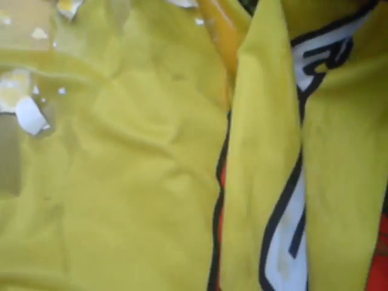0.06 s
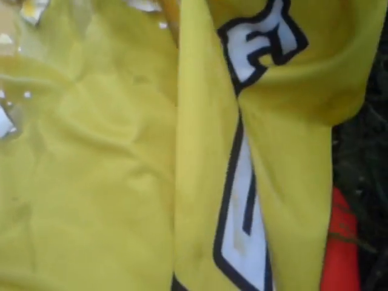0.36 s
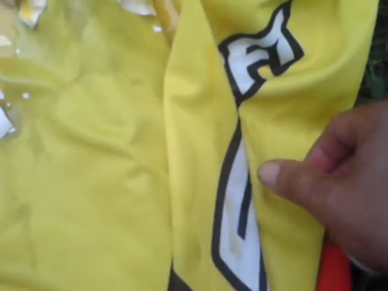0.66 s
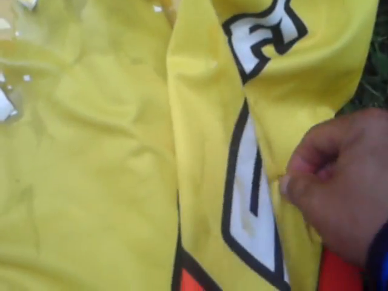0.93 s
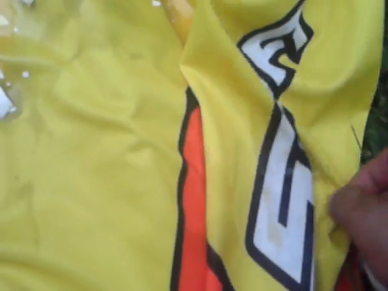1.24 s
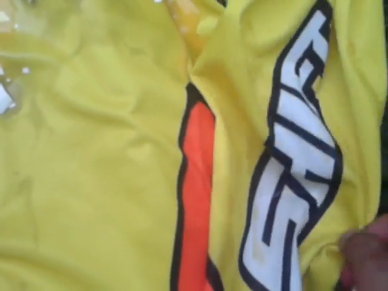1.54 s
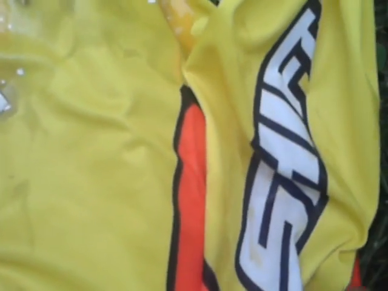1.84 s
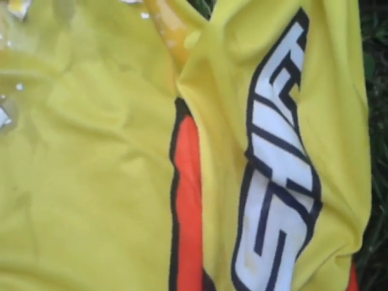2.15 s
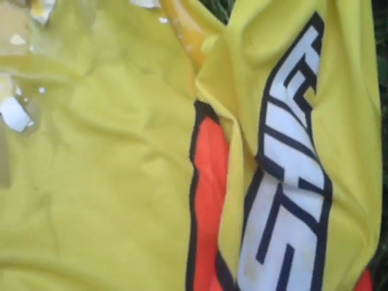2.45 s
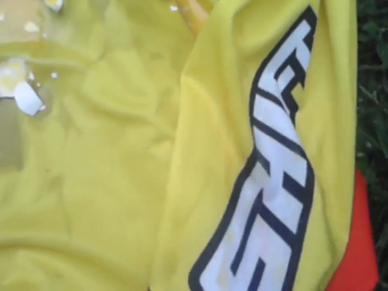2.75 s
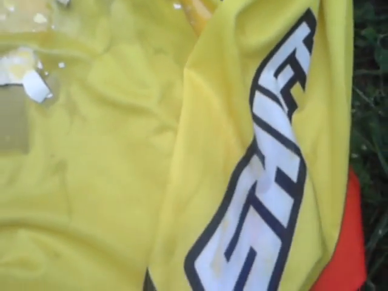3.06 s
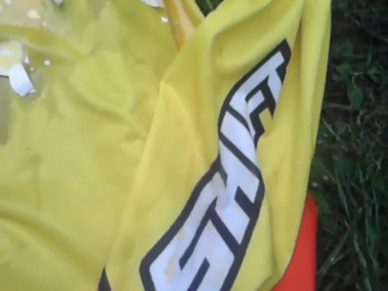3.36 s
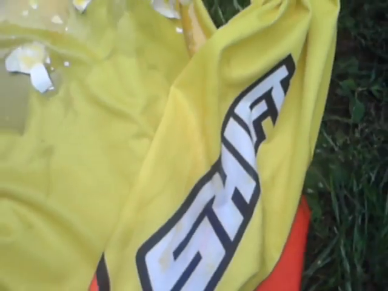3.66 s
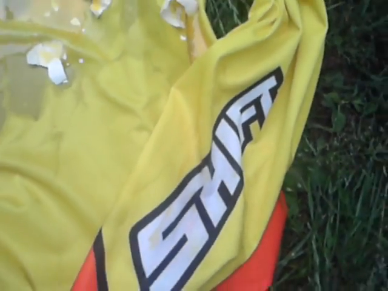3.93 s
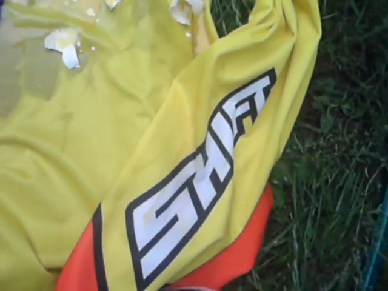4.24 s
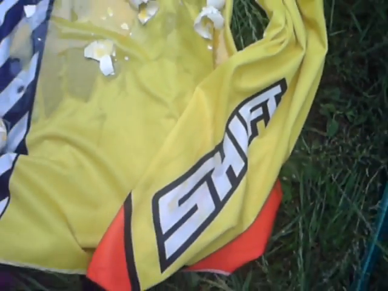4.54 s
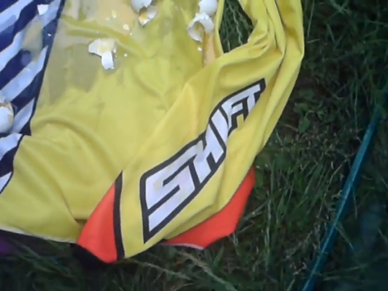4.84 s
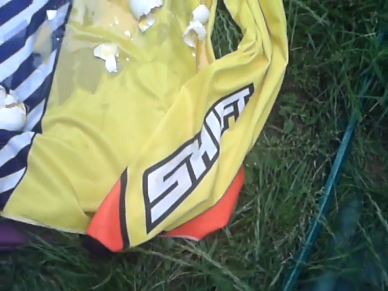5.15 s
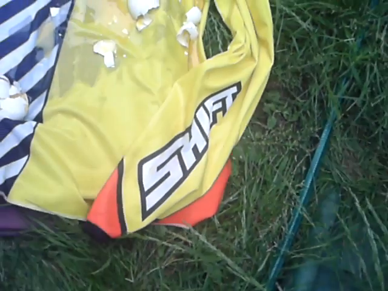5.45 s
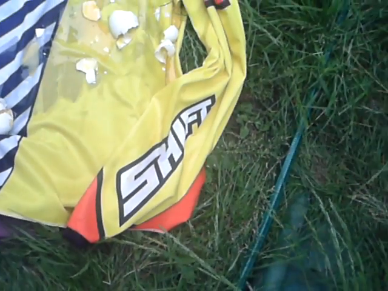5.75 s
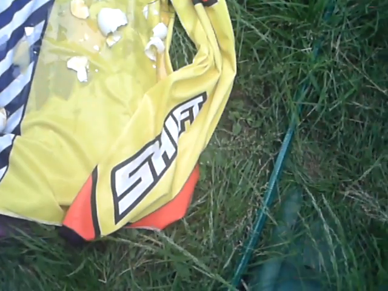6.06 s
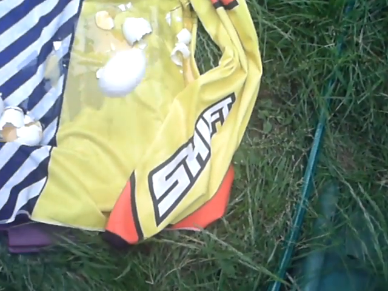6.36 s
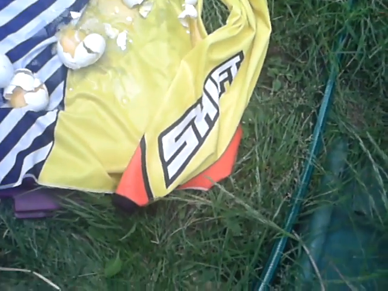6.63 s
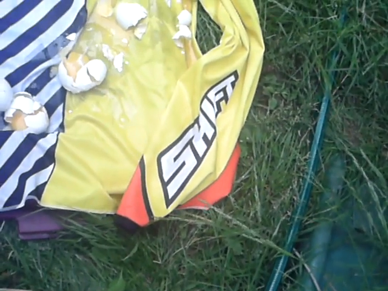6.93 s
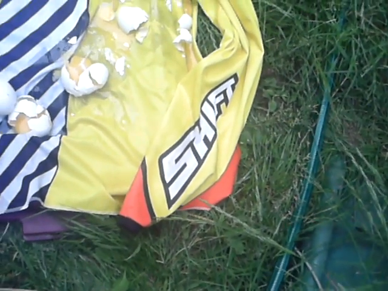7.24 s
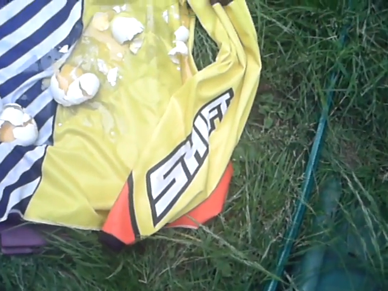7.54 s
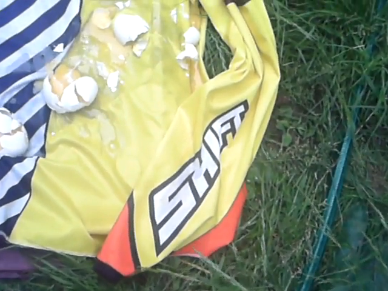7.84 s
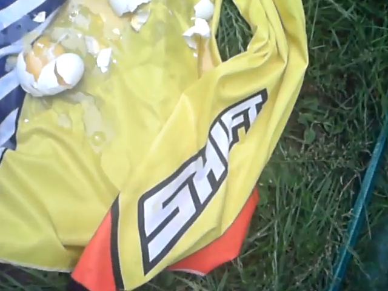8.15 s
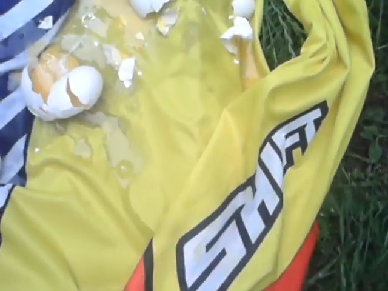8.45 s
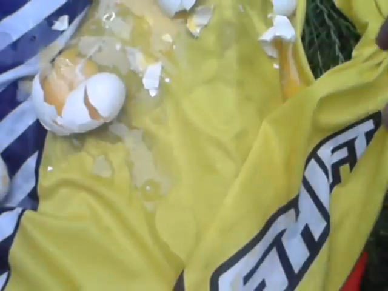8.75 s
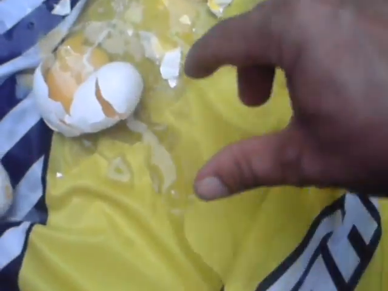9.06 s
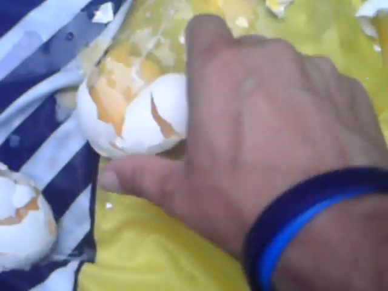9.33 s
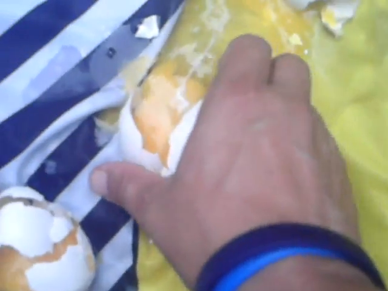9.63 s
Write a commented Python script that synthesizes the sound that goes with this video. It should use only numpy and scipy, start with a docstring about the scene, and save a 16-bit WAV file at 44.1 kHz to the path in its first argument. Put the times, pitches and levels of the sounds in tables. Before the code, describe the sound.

A quiet outdoor rumble and hiss run for the whole ten seconds or so, with faint wavering hums and a thin, high whine, heard through a hand-held microphone. A barely audible low puff of air comes at the very start. Small handling ticks with a brief soft rub occur at about 2.9 seconds and again around 4.7 seconds. At about 6.4 seconds an egg smashes on a shirt spread over grass: one sharp, close smack that combines a dull splat with the crack of shell. It is by far the loudest sound and slightly overloads the microphone. It dies away quickly with a faint outdoor reflection, while a few tiny bits of shell and yolk patter down by 6.5 seconds. The quiet background then continues alone until two soft, low puffs of air from a moving arm touch the microphone at about 9.5 and 9.7 seconds.

```python
"""Egg smashing on a shirt

An egg bursts on a shirt spread over a lawn and overloads a hand-held camera's microphone.
Quick blows ring egg, cloth and turf; the contents splat, the shell splinters, the garden
scatters the smack back and bits patter down. Handling adds ticks, rubs and low puffs of air.
Behind it: quiet rumble, hiss, a faint whine and hums that shift with the camera's height."""
import sys
import numpy as np
from scipy import signal
from scipy.fft import rfft, irfft, next_fast_len
from scipy.io import wavfile

SR = 44100
rng = np.random.default_rng(int(sys.argv[2]) if len(sys.argv) > 2 else 0)


def inscribe(sig):
    """Save sig as 16-bit PCM at rate SR to the path in sys.argv[1].

    A 1-D sig is mono; a 2-D sig holds one channel per row.
    Samples are clipped to [-1, 1] before scaling.
    """
    pcm = np.round(np.clip(np.atleast_2d(sig).T, -1, 1) * 32767)
    wavfile.write(sys.argv[1], SR, pcm.astype(np.int16))


N = 427329
TIME = np.arange(N) / SR
SMACK_S = 6.3786

# Spectrum of splinters and rubs. Each row: frequency in Hz, relative density in dB.
SCRATCH_SPECTRUM = [(200, 0), (700, -8), (1400, 0), (2300, -3), (2800, -10), (3250, -4), (3700, -3),
                    (4500, -7), (6000, -5)]


def from_db(db):
    """Decibels to gain."""
    return 10 ** (np.asarray(db) / 20)


def unit_rms(x):
    """Scale to rms 1."""
    return x / np.sqrt(np.mean(x ** 2) + 1e-20)


def coloured(x, spectrum):
    """Shape x by (Hz, dB) rows, rolling off below the first; rms 1."""
    size = next_fast_len(N)
    hz, db = np.transpose(spectrum)
    bins_hz = np.maximum(np.fft.rfftfreq(size, 1 / SR), 1)
    gain = from_db(np.interp(np.log(bins_hz), np.log(hz), db))
    gain *= np.minimum(bins_hz / hz[0], 1)
    return unit_rms(irfft(rfft(x, size) * gain, size)[:N])


def noise(spectrum):
    """Steady coloured noise; rms 1."""
    return coloured(rng.standard_normal(N), spectrum)


def narrow_noise(hz, width_hz):
    """Noise through one resonance: a wavering tone, rms 1."""
    radius = np.exp(-np.pi * width_hz / SR)
    feedback = [1, -2 * radius * np.cos(2 * np.pi * hz / SR), radius ** 2]
    return unit_rms(signal.lfilter([1, 0, -1], feedback, rng.standard_normal(N)))


def ring(force, hz, t60_s):
    """A mode radiating by its velocity: a click starts a decaying cosine."""
    radius = from_db(-60 / (t60_s * SR))
    feedback = [1, -2 * radius * np.cos(2 * np.pi * hz / SR), radius ** 2]
    return signal.lfilter([.5, 0, -.5], feedback, force + 1e-18)


def burst(start_s, rise_s, t60_s):
    """Envelope: quick rise, exponential decay."""
    age_s = np.maximum(TIME - start_s, 0)
    decay = np.exp(-np.minimum(np.log(1000) * age_s / t60_s, 50))
    return (1 - np.exp(-age_s / rise_s)) * decay


def taps(contacts, crack_db, crack_t60_s, knock_t60_s=.013, rise_s=.0001):
    """Light contacts: each a dead, pitched knock plus a short crack."""
    # Each row: frequency in Hz, relative density in dB.
    grit_spectrum = [(250, -8), (700, 3), (1400, 1), (2800, -5), (4000, -9), (6000, -4)]
    out, grit = np.zeros(N), noise(grit_spectrum)
    for start_s, db, hz in contacts:
        knock = np.sin(2 * np.pi * hz * (TIME - start_s)) * burst(start_s, rise_s, knock_t60_s)
        crack = from_db(crack_db) * grit * burst(start_s, rise_s, crack_t60_s)
        out += from_db(db) * (knock + crack)
    return out


def smack(spread_db=1.5):
    """The egg hits, caves in and slaps flat; briefer contacts reach higher modes."""
    # Each row: delay in seconds, mean level in dB, contact time in seconds.
    blows = [(0, 6, 0.00041), (.0014, 1.5, .00022), (.0034, 0, .00012)]
    # Egg, cloth and turf together. Each row: frequency in Hz, gain in dB, T60 in seconds.
    modes = [(150, -17, .06), (293, -13.5, 0.044), (448, -19, 0.095), (516, -7, 0.027), (665, -14, 0.047),
             (903, -14, 0.0246), (1084, -11.5, 0.0337), (1380, -15, 0.025), (1840, -23, 0.028),
             (2200, -8, .02), (3230, -3, 0.031), (4420, -5.5, .02)]
    force = np.zeros(N)
    for delay_s, db, contact_s in blows:
        offset = (TIME - SMACK_S - delay_s) / (contact_s / 2)
        push = np.exp(-offset.clip(-20, 20) ** 2)
        force += from_db(db + spread_db * rng.standard_normal()) * push / push.sum()
    return sum(from_db(db) * ring(force, hz, t60_s) for hz, db, t60_s in modes)


def splat(level_db=3.5, rise_s=.00098, t60_s=.017):
    """White and yolk burst out, driving air from under the cloth in one dull puff."""
    # Each row: frequency in Hz, relative density in dB.
    spectrum = [(60, -13.5), (150, -3), (280, 0), (520, 2), (900, -5), (1500, -8), (3000, -10),
                (6000, -17.5)]
    return from_db(level_db) * noise(spectrum) * burst(SMACK_S, rise_s, t60_s)


def splinters(level_db=-6.5, snaps_per_s=12000, spread_db=.5, rise_s=.00043, t60_s=.053):
    """Cracks run through the shell as a dense burst of tiny snaps."""
    sizes = from_db(spread_db * rng.standard_normal(N)) * rng.choice([-1, 1], N)
    snaps = sizes * (rng.random(N) < snaps_per_s / SR)
    return from_db(level_db) * coloured(snaps, SCRATCH_SPECTRUM) * burst(SMACK_S, rise_s, t60_s)


def garden_scatter(near_db=-8.5, far_db=-24.5):
    """Nearby ground returns the smack at once, hedges and fences later and fainter."""
    # Each row: frequency in Hz, relative density in dB.
    spectrum = [(50, -8), (130, -4), (280, -4.5), (430, 1.5), (680, -6.5), (1000, -4), (1600, -8.5),
                (2300, -10.5), (3300, -12.5), (4800, -11.5), (6000, -16)]
    near = from_db(near_db) * burst(SMACK_S, rise_s=.0024, t60_s=.1)
    far = from_db(far_db) * burst(SMACK_S, rise_s=.01, t60_s=.29)
    return noise(spectrum) * np.hypot(near, far)


def falling_bits():
    """Bits of shell and yolk land."""
    # Each row: start in seconds, level in dB, pitch in Hz.
    landings = [(6.4015, -21, 910), (6.4060, -15, 506), (6.4314, -30, 1030), (6.4680, -37, 430),
                (6.5036, -30, 524)]
    return taps(landings, crack_db=-9, crack_t60_s=.01)


def handling_ticks():
    """The camera ticks as it is handled."""
    # Each row: start in seconds, level in dB, pitch in Hz.
    ticks = [(2.9295, -37.5, 780), (2.9355, -42, 990), (4.6470, -31.5, 760), (4.7425, -38.5, 2580)]
    return taps(ticks, crack_db=1.5, crack_t60_s=.019)


def rubs():
    """Skin slides briefly with a soft scratch."""
    # Each row: centre in seconds, level in dB, half length in seconds.
    slides = [(2.936, -50, 0.007), (4.643, -47, .012)]
    swell = sum(from_db(db) / np.cosh(np.clip((TIME - centre_s) / half_s, -20, 20))
                for centre_s, db, half_s in slides)
    return swell * noise(SCRATCH_SPECTRUM)


def buffet(attack_s=.035, t60_s=.25):
    """A moving arm pushes air onto the microphone port; each puff swells, holds and dies."""
    # Each row: start of hold in seconds, level in dB, hold in seconds.
    puffs = [(0.03, -47, .17), (9.505, -32.5, .08), (9.68, -37, .03)]
    # Each row: frequency in Hz, relative density in dB.
    spectrum = [(10, -10), (25, 0), (45, -2.5), (75, -4), (110, -11.5), (170, -25), (400, -47), (1500, -73)]
    push = np.zeros(N)
    for full_s, db, hold_s in puffs:
        attack = np.clip(1 + (TIME - full_s) / attack_s, 0, 1)
        release = from_db(-60 * np.maximum(TIME - full_s - hold_s, 0) / t60_s)
        push += from_db(db) * attack * release
    return push * noise(spectrum)


def hums(mid_lift_s=4.4, mid_lower_s=8.0, move_s=.8):
    """Wavering hums whose balance shifts as the camera is lifted, then lowered."""
    # Each row: centre in Hz, width in Hz, level in dB, change when lifted in dB.
    bands = [(80.7, 14, -54, -4), (119, 4.8, -56.5, -2), (158.3, 14, -63.5, -3), (240, 25, -66, -3),
             (377, 32, -59, -4.5), (797, 70, -66.5, 4)]
    # 0 by the cloth, 1 at standing height
    height = np.clip(.5 + np.minimum(TIME - mid_lift_s, mid_lower_s - TIME) / move_s, 0, 1)
    return sum(from_db(db + lifted_db * height) * narrow_noise(hz, width_hz)
               for hz, width_hz, db, lifted_db in bands)


def whine(hz=2347, level_db=-69, waver=.42):
    """A thin, slightly wavering tone."""
    tone = np.sin(2 * np.pi * hz * TIME) + waver * narrow_noise(hz, width_hz=25)
    return from_db(level_db) * unit_rms(tone)


def rumble_and_hiss(level_db=-44.5):
    """Distant outdoor rumble and microphone hiss."""
    # Each row: frequency in Hz, relative density in dB.
    spectrum = [(15, 4), (30, -1.5), (55, 0), (100, -3), (150, -10), (230, -11.5), (310, -13.5), (480, -15),
                (640, -18), (950, -18.5), (1600, -21), (3000, -23.5), (5000, -24), (6500, -29)]
    return from_db(level_db) * noise(spectrum)


def scene():
    """Egg, handling and background at one microphone."""
    egg = smack() + splat() + splinters() + garden_scatter() + falling_bits()
    handling = handling_ticks() + rubs() + buffet()
    background = hums() + whine() + rumble_and_hiss()
    return (egg + handling + background)[None]


def record(dry, overload=.73, ceiling=.72, bandwidth_hz=5370, cutoff_hz=16000):
    """The preamplifier overloads, a low-pass rounds the flat tops, their overshoot clips again."""
    driven = dry / (1 + np.abs(dry / overload) ** 6) ** (1 / 6)
    narrow = signal.sosfilt(signal.butter(20, bandwidth_hz, fs=SR, output="sos"), driven)
    clipped = np.clip(narrow, -ceiling, ceiling)
    return signal.sosfilt(signal.ellip(10, .1, 80, cutoff_hz, fs=SR, output="sos"), clipped)


dry = scene()
out = record(dry)
inscribe(out)
```